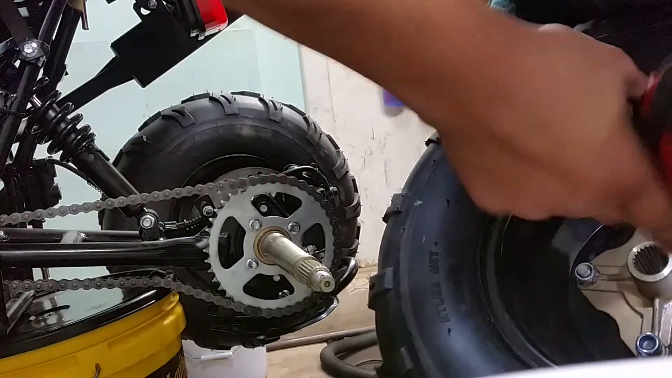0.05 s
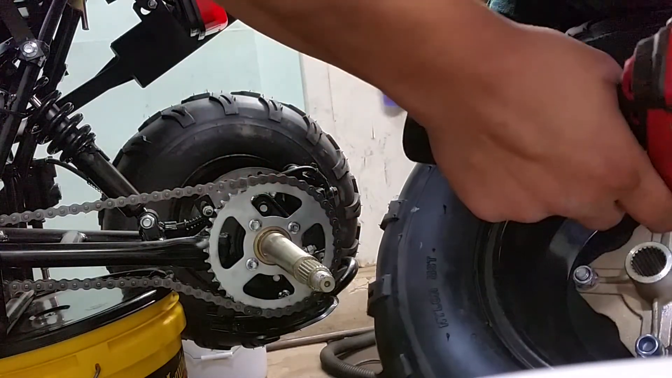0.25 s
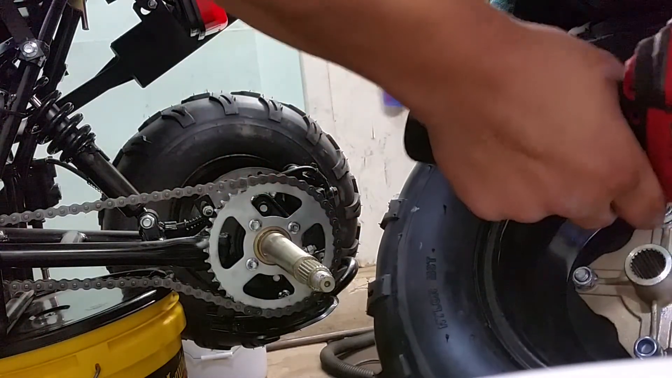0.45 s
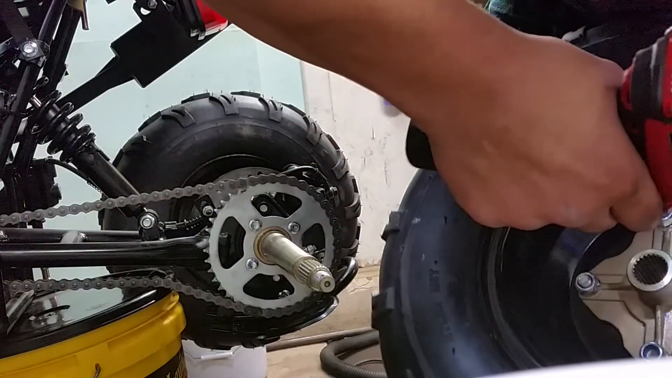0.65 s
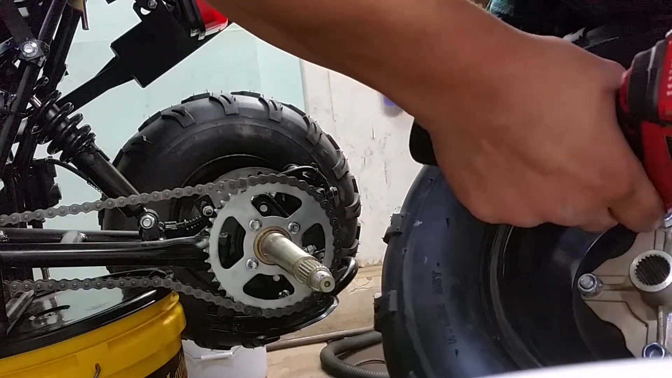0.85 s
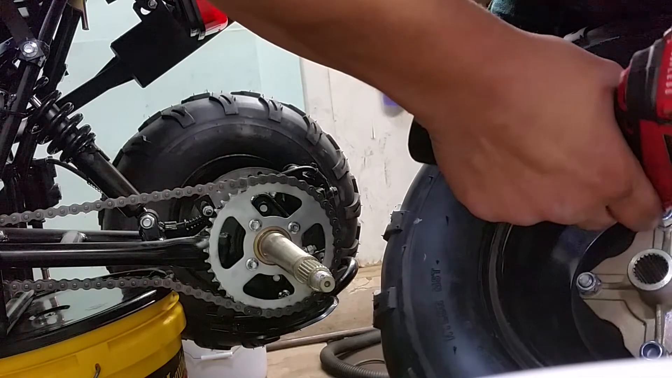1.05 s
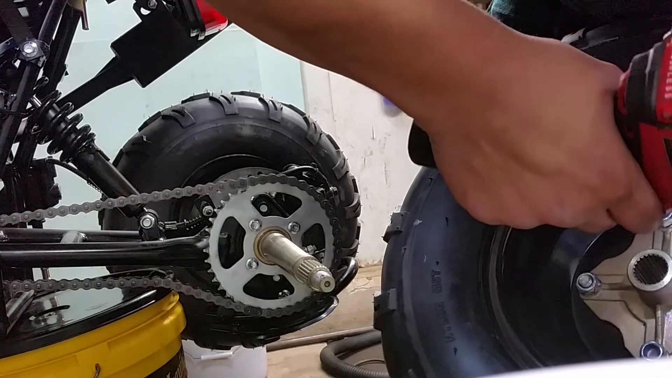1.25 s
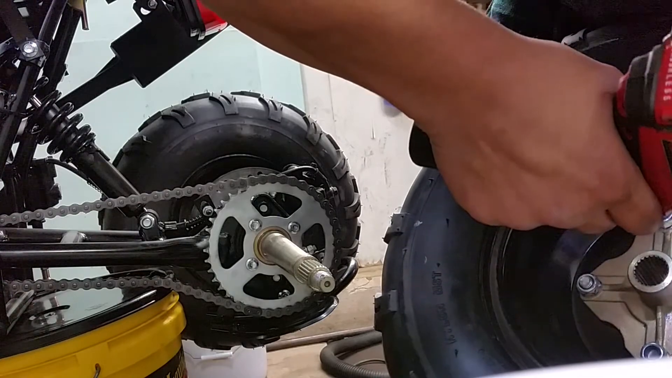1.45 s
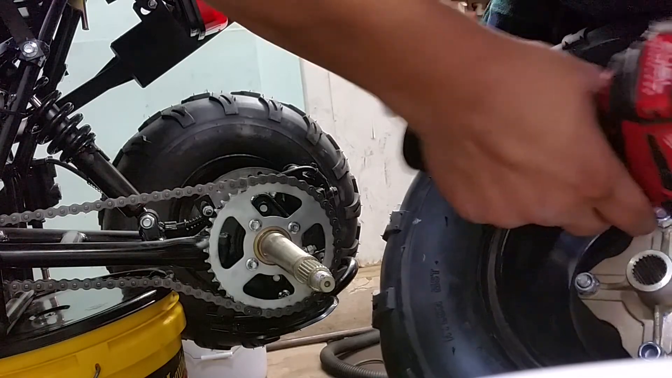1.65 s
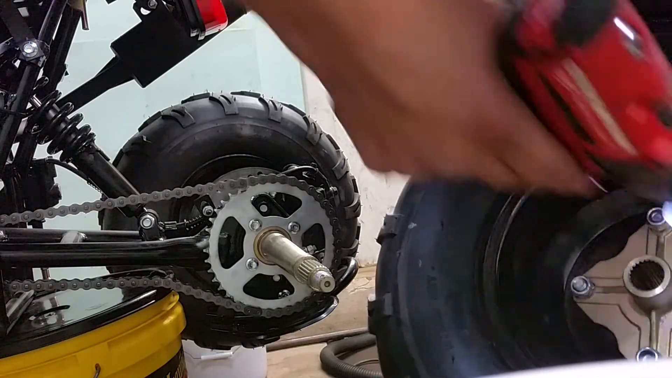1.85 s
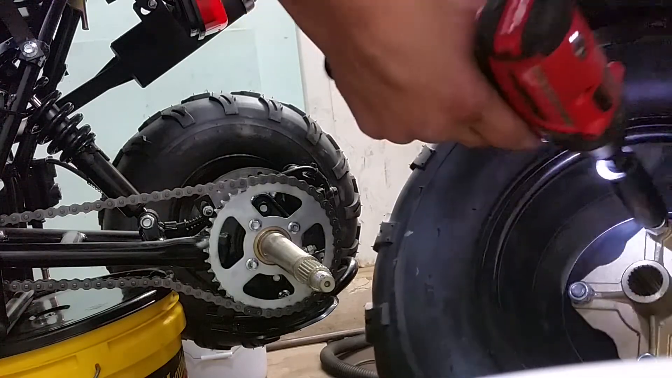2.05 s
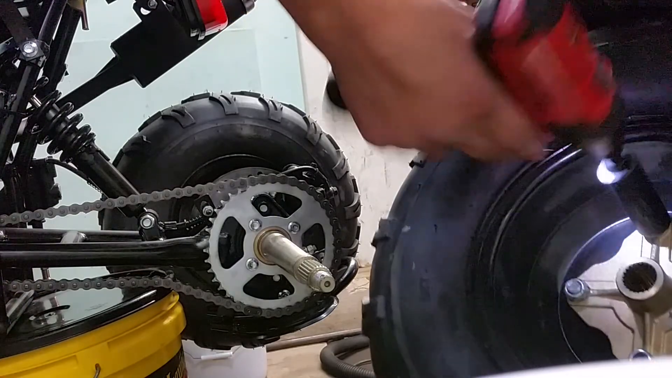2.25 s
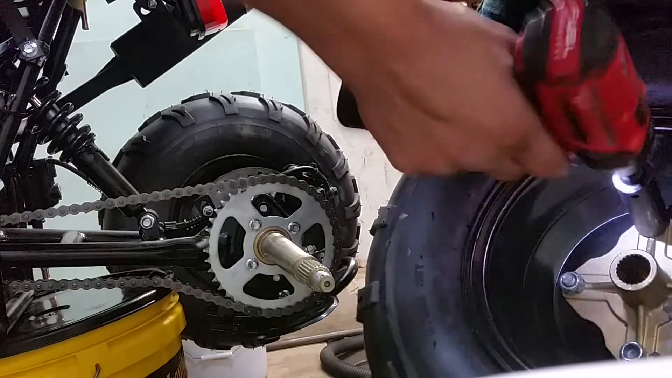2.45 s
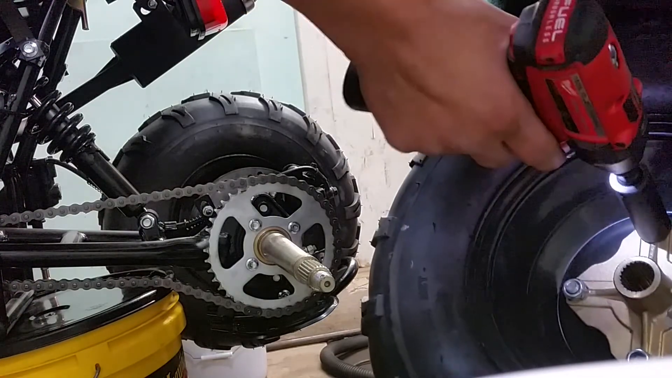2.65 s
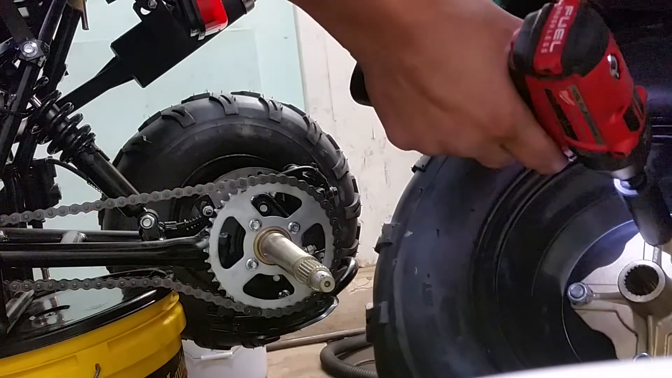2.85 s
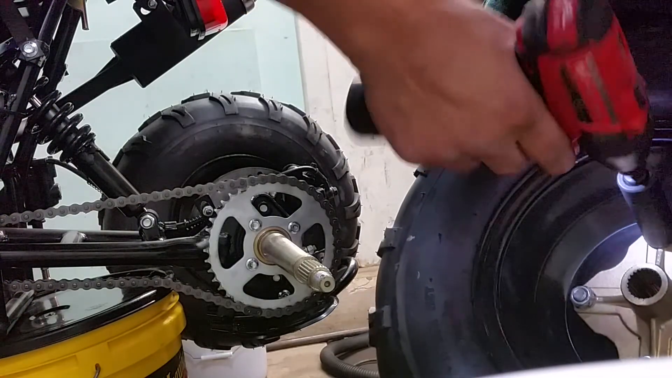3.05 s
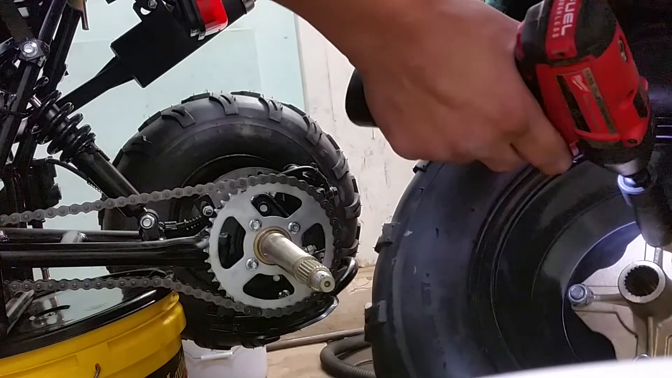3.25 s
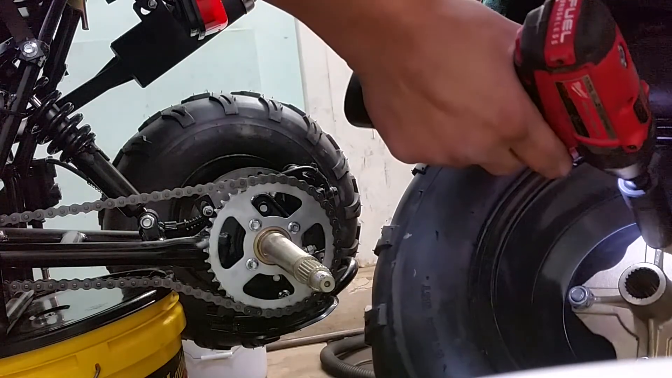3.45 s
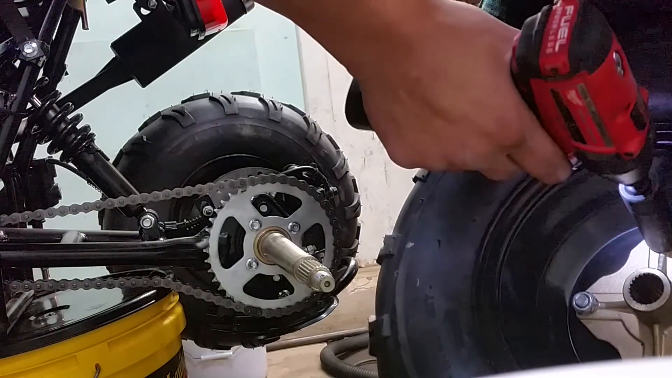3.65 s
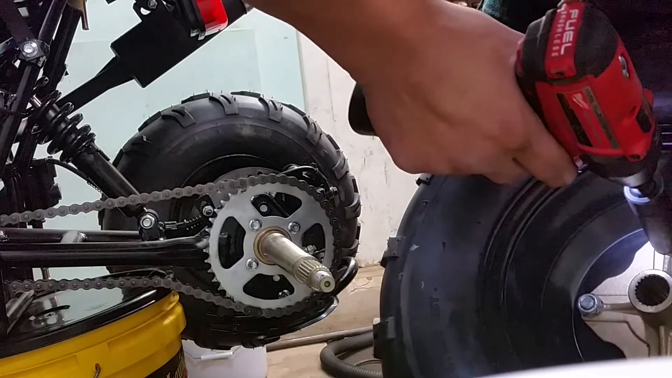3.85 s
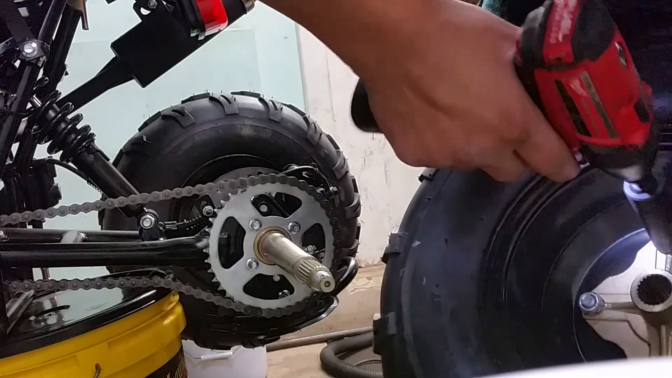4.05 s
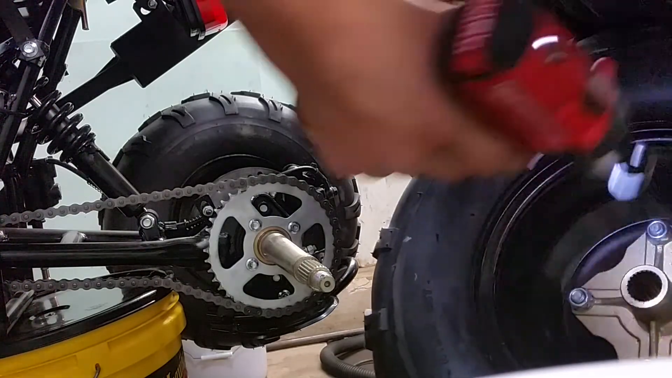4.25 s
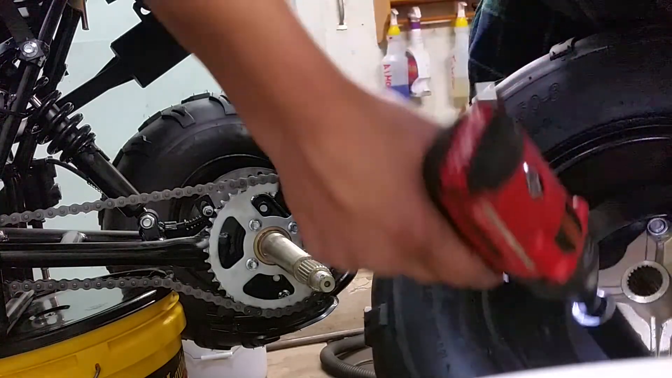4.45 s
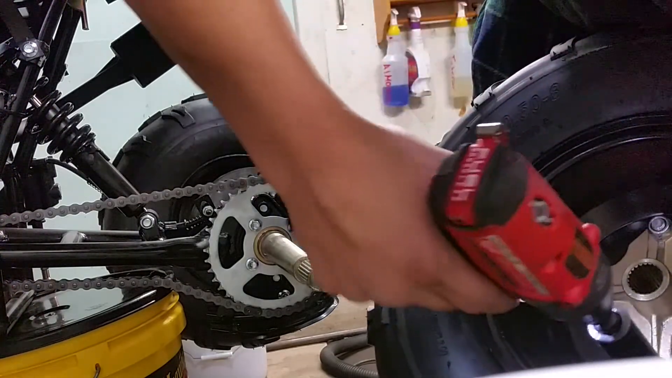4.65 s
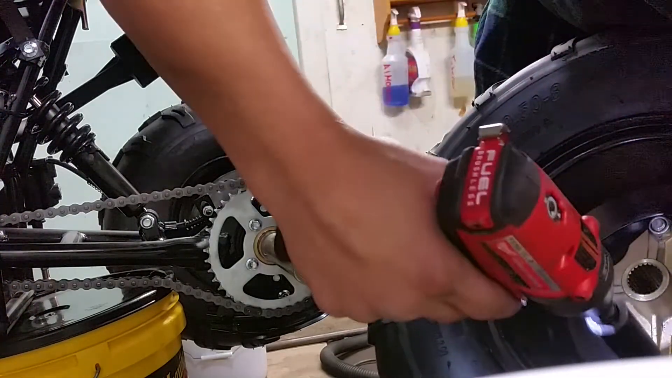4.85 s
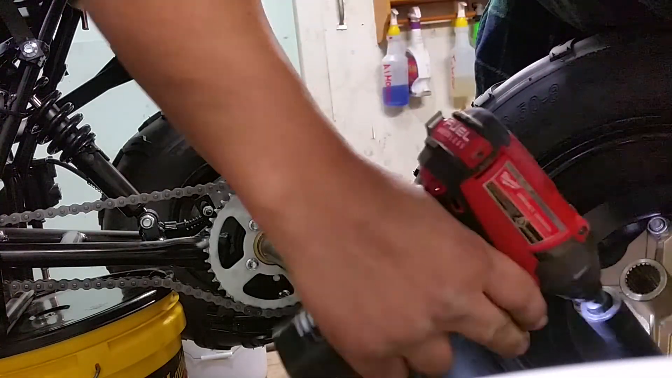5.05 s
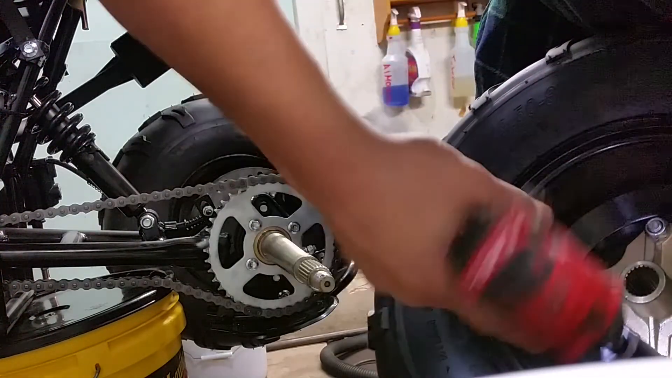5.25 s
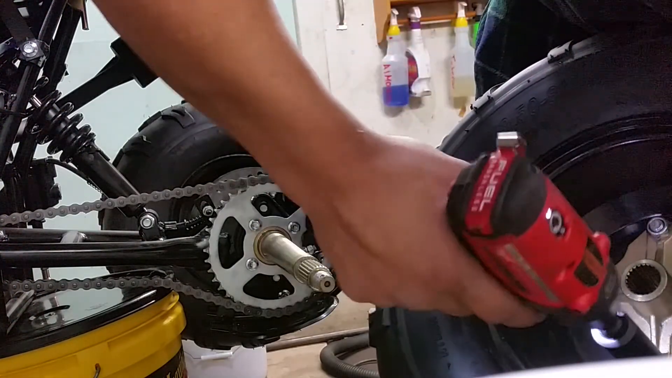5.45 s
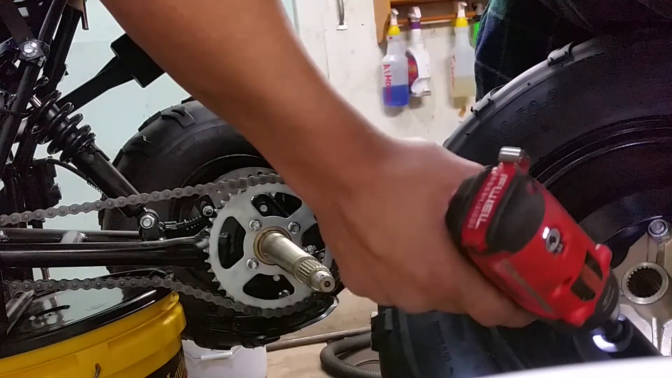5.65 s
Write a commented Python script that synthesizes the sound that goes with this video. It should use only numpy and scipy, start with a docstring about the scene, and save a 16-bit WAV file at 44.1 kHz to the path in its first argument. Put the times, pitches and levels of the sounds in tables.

```python
"""A motor whines, a loose nut rattles, then rapid hammering: a cordless impact wrench at work.
It runs three nuts onto a steel wheel in a small workshop. Inside the tool a hammer strikes a steel
block, the anvil, faster once the nut is tight. Each blow cracks, shakes the wheel and thumps.
Between the bursts the socket (the cup that holds the nut) knocks and scrapes on the rim and its bolts.
The room echoes it all, over a faint steady noise."""
import sys
import numpy as np
from scipy import signal
from scipy.fft import rfft, irfft, next_fast_len
from scipy.io import wavfile

SR = 44100
rng = np.random.default_rng(int(sys.argv[2]) if len(sys.argv) > 2 else 0)


def to_wav(s):
    """Save 16-bit WAV."""
    ch = np.atleast_2d(s).T  # columns
    pcm = np.round(np.clip(ch, -1, 1) * 32767)  # PCM
    wavfile.write(sys.argv[1], SR, pcm.astype(np.int16))


N = 252252
TIME = np.arange(N) / SR
FFT_SIZE = 2 * next_fast_len(N // 2 + SR // 2)
HZ = np.fft.rfftfreq(FFT_SIZE, 1 / SR)

# tone of a light touch on the wheel: pitch_hz, level_db
LIGHT_TOUCH = [(80, 5.5), (170, -1.5), (250, 5), (420, -1), (650, -2), (1000, -2), (2400, -6.5),
               (3200, -10.5), (6000, 0.5)]


def amp(db):
    """Turn decibels into a gain."""
    return 10 ** (np.asarray(db) / 20)


def unit(x):
    """Scale x to an average power of 1."""
    return x / np.sqrt(np.mean(np.abs(x) ** 2) + 1e-20)


def along(points, hz):
    """Read between (pitch_hz, value) points, with octaves evenly spaced."""
    pitches, values = np.transpose(points)
    return np.interp(np.log(hz + 1), np.log(pitches + 1), values)


def filtered(x, response):
    """Pass x through a filter, given as its response at each pitch."""
    return irfft(rfft(x, FFT_SIZE) * response, FFT_SIZE)[..., :N]


def colour(points):
    """A filter shaped by (pitch_hz, level_db) points; it never sounds before it is struck."""
    cepstrum = irfft(np.log(amp(along(points, HZ))))
    cepstrum[1:FFT_SIZE // 2] *= 2
    cepstrum[FFT_SIZE // 2 + 1:] = 0
    return unit(np.exp(rfft(cepstrum)))


def resonances(tones):
    """A filter that rings at each (pitch_hz, width_hz, level_db); narrow tones ring longer."""
    return unit(sum((-1) ** k * amp(db) * 1j * HZ * width / (hz * hz - HZ ** 2 + 1j * HZ * width)
                    for k, (hz, width, db) in enumerate(tones)))


def pulses(times, sizes):
    """One spike at each time."""
    return np.bincount(np.clip(np.round(times * SR), 0, N).astype(int), sizes, N + 1)[:N]


def contacts(per_s):
    """Tiny random impacts of uneven size."""
    return unit((rng.random(N) < per_s / SR) * rng.choice([-1, 1], N) * amp(rng.standard_normal(N)))


def chatter(hits, fade_s, attack_s):
    """Each hit becomes a burst of fine contacts, new on each side, falling 60 dB in fade_s."""
    t = np.arange(SR // 8) / SR
    shape = (amp(-60 * t / fade_s) * (1 - np.exp(-t / attack_s))) ** 2
    power = np.abs(signal.fftconvolve(hits ** 2, shape / shape.sum())[:N])
    return np.sqrt(power) * rng.standard_normal((2, N))


def run_gains(catch_s, end_s, rattle_db, high_db, low_db):
    """Gains of the rattle and both whines: the motor spins up, the socket catches, the nut lands."""
    start_s, full_s = catch_s - 0.028, catch_s + 0.019
    landing = amp(np.interp(end_s - TIME, [0, 0.02], [-34, 0]))  # dies as the nut meets the wheel
    running = ((TIME >= start_s) & (TIME <= end_s)) * landing
    spin_db = np.interp(TIME, [start_s, full_s], [-12.5, 0])
    swell_db = 70 * (np.clip(TIME, start_s, end_s) - (catch_s + end_s) / 2)  # the motor gathers speed
    rattle = (TIME >= catch_s) * amp(rattle_db + np.interp(TIME, [catch_s, full_s], [-26, 0]))
    return running * np.array([rattle, amp(high_db + swell_db + spin_db / 2), amp(low_db + spin_db)])


def motor_run():
    """The motor and gears whirr while the loose socket and nut rattle against the wheel."""
    # spins before the hammering: catch_s, end_s, rattle_db, high_whine_db, low_whine_db
    runs = [(0.016, 0.147, -15, -29.5, -41), (2.295, 2.436, -25, -39.5, -47.5),
            (5.247, 5.332, -12, -34.5, -37.5)]
    # the motor's high whine and its housing's lower one: pitch_hz, width_hz, level_db
    motor_tones = [(9950, 280, 0), (10550, 700, -6)]
    housing_tones = [(3600, 220, 0)]
    rattle, high, low = sum(run_gains(*run) for run in runs)
    impacts = contacts(per_s=800)
    high_whine = high * filtered(rng.standard_normal((2, N)), resonances(motor_tones))
    low_whine = low * filtered(rng.standard_normal((2, N)), resonances(housing_tones))
    gears = steel(impacts * np.sqrt(rattle * high), fade_s=0.0016, attack_s=0.00025)
    nut = filtered(wheel(impacts * rattle, loose_db=-13.5, fade_s=0.0095), amp(along(LIGHT_TOUCH, HZ)))
    return amp(-5.5) * nut + amp(2) * high_whine + amp(7) * low_whine + amp(-4.5) * gears


def steel(hits, fade_s, attack_s):
    """The bright crack of hard steel, louder on the right where the tool is."""
    # the crack as each side hears it: pitch_hz, level_db
    left_tone = [(300, -21.5), (1500, -7.5), (2500, -16), (4000, -10.5), (6200, -8.5), (6850, 0),
                 (7800, -2), (9000, -2.5), (10200, 0), (11200, -7.5), (12800, -1.5), (15700, -4.5)]
    right_tone = [(300, -18.5), (1500, -10.5), (2500, -14), (4000, -12.5), (7000, -12.5), (9000, -4.5),
                  (10400, 3), (11100, 1), (12200, 0.5), (13500, 0.5), (15700, -4.5)]
    bursts = chatter(hits, fade_s, attack_s)
    return filtered(bursts, [colour(left_tone), colour(right_tone)]) * amp([[-1.7], [1.3]])


def wheel(hits, loose_db, fade_s):
    """A dead knock on the bolt; the hit and the chatter after it set the wheel ringing."""
    # rim, hub and tyre: pitch_hz, width_hz, level_db
    wheel_tones = [(162, 48, -5), (289.4, 69, -2), (416, 75, -7), (504, 80, 0), (576, 45.5, 0.5),
                   (908, 76, -7.5), (1180, 26, -5.5), (1422, 106, -2), (1690, 130, -23.5), (2294, 70, -7),
                   (4260, 380, -29)]
    # the bolt's knock: pitch_hz, level_db
    bolt_tone = [(60, -16), (200, -7.5), (550, 6), (800, -3), (1300, 3.5), (1900, -3.5), (2800, -3),
                 (4500, -15), (8000, -25.5)]
    middle, side = chatter(hits, fade_s, attack_s=0.00035)
    loose = 1.53 * middle + 0.14 * np.array([side, -side])
    drive = (hits + amp(loose_db) * loose) / np.hypot(1, amp(loose_db))
    lag = np.exp(-2j * np.pi * HZ * np.array([[.00013], [0]]))  # the left side is a little farther away
    ringing = filtered(drive, resonances(wheel_tones) * lag)
    rough_hits = .6 * hits + .8 * chatter(hits, fade_s=.007, attack_s=.0002)
    knock = filtered(rough_hits, colour(bolt_tone) * lag)
    return (amp(-3.5) * ringing + knock) * amp([[-1], [1]])


def anvil_clacks():
    """The anvil clacks as the drive takes hold or stops."""
    # single clacks: start_s, level_db
    clacks = [(0.0247, 3), (1.5443, 10.5), (2.304, 3), (2.419, 3), (3.956, 10), (3.9808, 3.5), (5.25, 4.5)]
    times, level_db = np.transpose(clacks)
    return steel(pulses(times + 0.00094, amp(level_db)), fade_s=0.04, attack_s=0.00039)


def blows():
    """Time, nut tightness (0 to 1) and crack, wheel and thump strength of every hammer blow."""
    # hammer speed on each nut: time_s, blows_per_s
    first_nut = [(0.157, 36.74), (0.19, 45.93), (0.21, 47.33), (0.4, 47.77), (0.5, 51.63), (0.62, 59.47),
                 (0.75, 58.2), (1.1, 57.91), (1.47, 57.5), (1.5148, 32.27)]
    second_nut = [(2.4265, 40.12), (2.47, 46.66), (2.65, 49.04), (2.78, 46.49), (2.9, 57.99), (3.02, 58.02),
                  (3.4, 57.14), (3.85, 58.02), (3.9363, 51.64)]
    third_nut = [(5.3355, 44.09), (5.38, 43.39), (5.5, 50.85), (5.6, 50.48), (5.7116, 52.32)]
    # the nuts: speed, crack_db, wheel_db, thump_db
    nuts = [(first_nut, -16, -30.5, -42), (second_nut, -15.5, -29.5, -36.5),
            (third_nut, -17, -29.5, -48.5)]
    # changes in force: crack, wheel, thump
    tight_db = [0.37, 2.22, 2]  # a tight nut throws the blow back harder
    growth_db_per_s = [1.1, 1.03, 1.8]  # while the trigger is held
    first_blow_db = [2.5, 1.5, -0.5]  # the free-running motor is behind it
    let_go_db = [-5.5, -13.5, -31]  # as the trigger is released
    rows = []
    for speed, *level_db in nuts:
        speed_s, blows_per_s = np.transpose(speed)
        t = TIME[(TIME >= speed_s[0]) & (TIME <= speed_s[-1])]
        count = np.cumsum(np.interp(t, speed_s, blows_per_s)) / SR
        times = np.interp(np.arange(int(count[-1]) + 1), count, t)
        rate = np.interp(times, speed_s, blows_per_s)
        tight = np.interp(rate, [48, 57], [0, 1])  # faster blows mean a tighter nut
        let_go = np.interp(t[-1] - times, [0, 0.017], [1, 0])
        force_db = (np.array(level_db) + np.outer(tight, tight_db)
                    + np.outer(times - times[0], growth_db_per_s)
                    + np.outer(times == times[0], first_blow_db) + np.outer(let_go, let_go_db))
        slack_s = np.interp(tight, [0, 1], [.0004, .00007])  # a turning nut is struck less evenly
        times = times + slack_s * rng.standard_normal(len(times))
        force_db += rng.standard_normal((len(times), 3)) * [1, 1.6, 1]
        rows.append(np.column_stack([times, tight, amp(force_db) * np.sqrt(SR / rate)[:, None]]))
    return np.vstack(rows).T


def hammer():
    """Each blow cracks and shakes the wheel; a second, weaker crack about 4 ms later thickens it."""
    # blows with an extra-heavy bass thump, mostly on the right: time_s, extra_thump_db
    heavy_blows = [(.29, 18.5), (.352, 16.5), (.374, 17), (.739, 15.5), (1.45, 17), (1.467, 7.5),
                   (2.427, 9.5), (2.449, 9), (2.558, 12.5), (3.038, 12), (3.106, 14), (3.63, 12),
                   (3.788, 14), (3.91, 9)]
    # chatter in the wheel after a blow: turning_nut_db, tight_nut_db
    chatter_db = [2.5, -4.5]
    times, tight, crack, shake, thump = blows()
    heavy_db = sum(db * (times == times[np.argmin(np.abs(times - at))]) for at, db in heavy_blows)
    second_crack_times = times + 0.0037 + 0.0009 * rng.standard_normal(len(times))
    strikes = pulses(times, crack) + pulses(second_crack_times, crack * amp(-6.5))
    cracks = steel(strikes, fade_s=0.033, attack_s=0.00012)
    ticks = contact_ticks(times, crack)
    loose_db = np.interp(TIME, times, np.interp(tight, [0, 1], chatter_db))
    body = wheel(pulses(times + 0.00059, shake * amp(0.15 * heavy_db)), loose_db, fade_s=0.043)
    bass = thumps(times, thump, heavy_db) + hub_buzz(times, shake * tight)
    return amp(-5) * cracks + ticks + amp(-3.5) * body + amp(-6.5) * socket_ring(times, crack) + bass


def contact_ticks(times, crack):
    """The hard first contact of hammer and anvil makes a short tick."""
    # the tick: pitch_hz, level_db
    tick_tone = [(300, -17.5), (1200, -4.5), (2500, -1), (4700, -1.5), (7000, -5.5), (14000, -4.5)]
    uneven_db = 2.5 * np.clip(rng.standard_normal(len(times)), -2, 2)
    hits = pulses(times + 0.00041, crack * amp(-14 + uneven_db))
    return filtered(chatter(hits, fade_s=0.0068, attack_s=.0001), colour(tick_tone))


def thumps(times, size, heavy_db):
    """Uneven bass thumps, a few extra heavy, much stronger on the right."""
    # the thump: pitch_hz, level_db
    thump_tone = [(12, -11), (40, -6), (100, 0), (170, -5), (350, -12), (2500, -66)]
    uneven_db = 5 * np.clip(rng.standard_normal(len(times)), -2, 1.6)
    size = size * amp(np.where(heavy_db > 0, heavy_db, uneven_db))
    right = pulses(times, size * rng.choice([-1, 1], len(times)))
    left = .1 * right + .38 * chatter(pulses(times, size), fade_s=.06, attack_s=.001)[0]
    return filtered(np.array([left, right]), colour(thump_tone))


def hub_buzz(times, size):
    """Even blows on a tight nut add up to a pitched buzz in the wheel's hub."""
    # the stiff hub: pitch_hz, width_hz, level_db
    hub_tones = [(119, 29, -6), (172, 25, 1), (283.8, 32, -1), (405.7, 25, -5.5), (574, 22, -2),
                 (1151, 27, -7.5)]
    return amp(-13) * filtered(pulses(times, size), resonances(hub_tones))


def socket_ring(times, crack):
    """The socket rings while loose; it sits differently at each blow, so each tone flutters."""
    # the socket: pitch_hz, width_hz, level_db, left_over_right_db
    socket_tones = [(4390, 55, -5, 1), (5175, 50, -4, 0), (6800, 220, -8, 10)]
    # when it sits loose: start_s, end_s, low_tone_db, middle_tone_db, high_tone_db
    loose_spells = [(0.582, 1.28, -10.5, -9.5, -8.5), (1.28, 1.52, -12, -12, -16),
                    (3.18, 3.95, -17, -18.5, -24)]
    tone_gains = sum(np.outer(amp(tone_db), (times >= start) & (times < end))
                     for start, end, *tone_db in loose_spells)
    ring = np.zeros((2, N))
    for (hz, width, db, pan_db), gain in zip(socket_tones, tone_gains):
        flutter_db = 4 * rng.standard_normal(len(times))
        drive = pulses(times, crack * gain * amp(db + flutter_db) * rng.choice([-1, 1], len(times)))
        ring += filtered(drive, resonances([(hz, width, 0)])) * amp([[pan_db / 2], [-pan_db / 2]])
    return ring


def knocks_and_scrapes():
    """The socket bumps and rubs on the wheel: dull knocks, steel clicks and a ringing rim."""
    # socket and tool touch the wheel: start_s, knock_db, click_db
    touches = [(1.866, -8, -12), (1.953, -15.5, -14), (1.977, -17.5, -29), (2.073, -36, -19.5),
               (2.165, -6.5, -25), (2.192, -9.5, -22), (4.282, -0.5, -6), (4.564, -10.5, -15.5),
               (4.693, -14.5, -7.5), (4.711, -16, -31), (5.002, -9, -16), (5.062, -15, -20),
               (5.101, 11.5, -9), (5.184, 0, -12)]
    # bursts of rough rubbing on the wheel: loudest_s, rise_s, fall_s, level_db
    scrapes = [(4.35, .05, 0.083, -44.5), (5.0, 0.089, 0.24, -40.5), (5.121, .02, .16, -28)]
    # the rim ringing freely: pitch_hz, width_hz, level_db
    rim_tones = [(950, 12, -0.5), (1418, 14, 3), (2326, 16, -2), (2370, 18, -3), (4650, 16, -9.5),
                 (6560, 16, -5)]
    times, knock_db, click_db = np.transpose(touches)
    pressure = sum(amp(db - 28.5 * np.maximum((at - TIME) / rise, (TIME - at) / fall))
                   for at, rise, fall, db in scrapes)
    rubbing = contacts(per_s=450) * pressure
    taps = pulses(times + .003, amp(knock_db))
    knocks = wheel(taps + rubbing, loose_db=-7.5, fade_s=0.027)
    ring = amp(-16) * filtered(taps, resonances(rim_tones))
    steel_hits = pulses(times + 0.00089, amp(click_db)) + amp(-8.5) * rubbing
    clicks = steel(steel_hits, fade_s=0.044, attack_s=0.00025)
    return filtered(knocks, amp(along(LIGHT_TOUCH, HZ))) + ring + clicks


def workshop_echo(x):
    """A wash of echoes from the walls; deep bass and high treble die first."""
    # time the echo takes to fall 60 dB: pitch_hz, fade_s
    fade_times = [(100, 0.16), (500, 0.46), (2000, 0.5), (7000, 0.43), (11000, 0.39), (16000, 0.3)]
    # strength of the echo: pitch_hz, level_db
    echo_tone = [(50, -19), (200, -7.5), (600, -8.5), (2000, -2), (7000, -0.5), (15000, -5)]
    echoes = np.zeros((2, N + SR))
    step = SR // 8  # a new random echo each step, as arm and tool move
    for start in range(0, N, step):
        hz, t, noise = signal.stft(rng.standard_normal((2, SR * 3 // 4)), SR, nperseg=256)
        decay = amp(-60 * t / along(fade_times, hz)[:, None]) * (1 - np.exp(-t / 0.0031))
        decay *= amp(along(echo_tone, hz))[:, None] / np.sqrt(np.mean(decay ** 2, axis=1, keepdims=True))
        tail = signal.istft(noise * decay, SR, nperseg=256)[1]
        answer = signal.fftconvolve(x[:, start:start + step], tail / np.sqrt(tail.shape[1]), axes=1)
        echoes[:, start:start + answer.shape[1]] += answer
    return echoes[:, :N]


def room_noise():
    """A faint, steady rumble and hiss."""
    # the noise: pitch_hz, level_db
    noise_tone = [(25, -9.5), (100, 1.5), (280, 1), (600, -8), (1500, -29.5), (5500, -39.5), (7000, -12.5),
                  (9000, -24), (11000, -16), (15500, -9)]
    middle, side = filtered(rng.standard_normal((2, N)), colour(noise_tone))
    return amp(-52.5) * (middle + .45 * np.array([side, -side]))


def scene():
    """The wrench and the wheel in the workshop."""
    direct = motor_run() + anvil_clacks() + hammer() + knocks_and_scrapes()
    return direct + workshop_echo(direct) + room_noise()


def record(dry):
    """Round off the highest peaks and cut the treble above 15800 Hz."""
    rounded = dry / (1 + dry ** 8) ** (1 / 8)
    return filtered(rounded, 1 / (1 + (HZ / 15800) ** 300))


dry = scene()
out = record(dry)
to_wav(out)
```